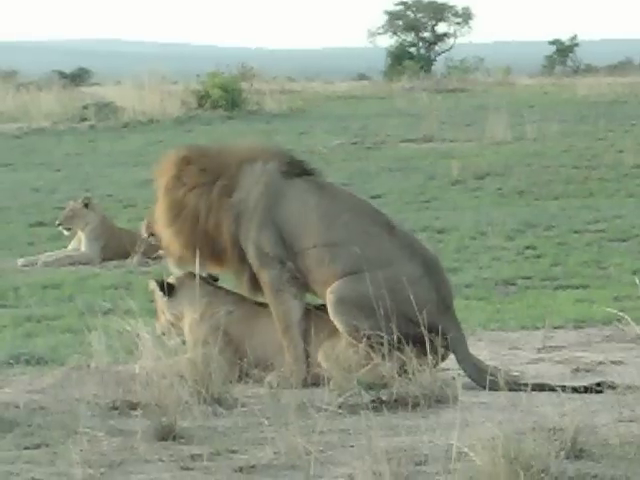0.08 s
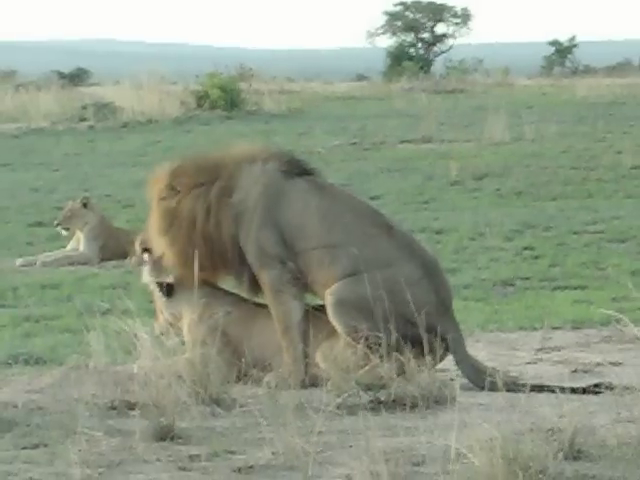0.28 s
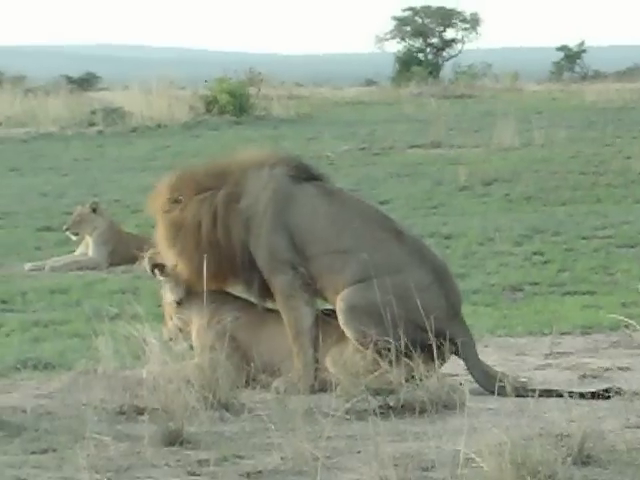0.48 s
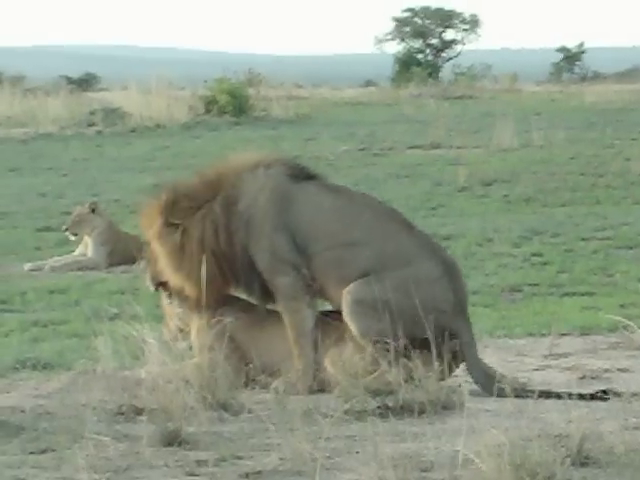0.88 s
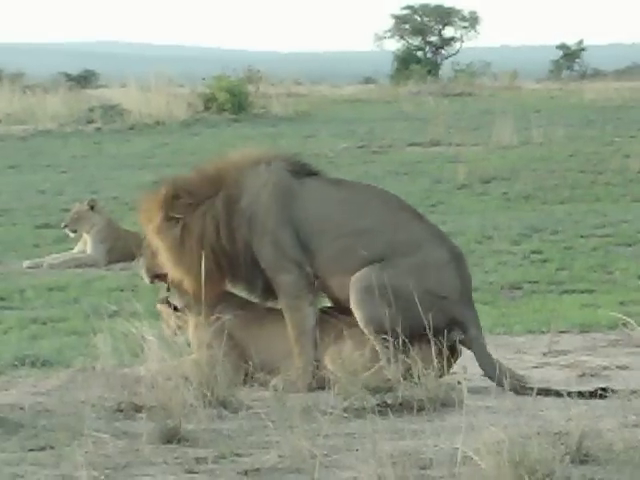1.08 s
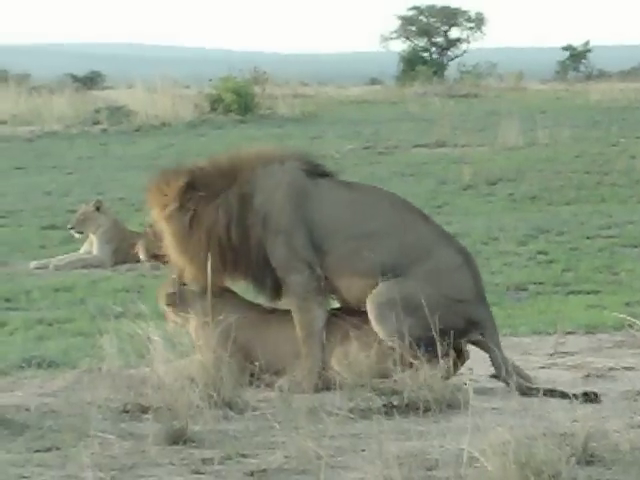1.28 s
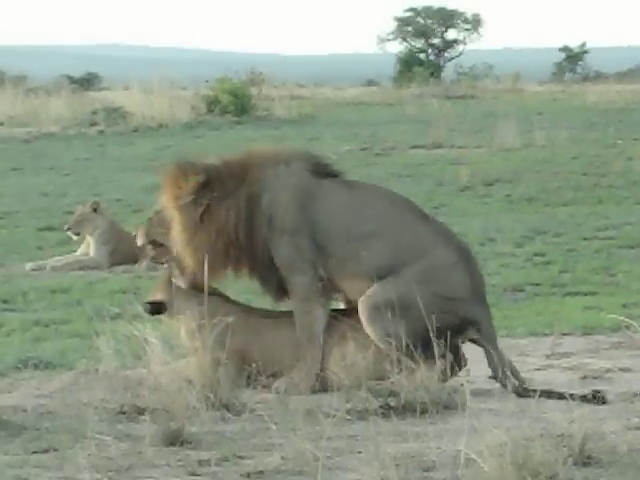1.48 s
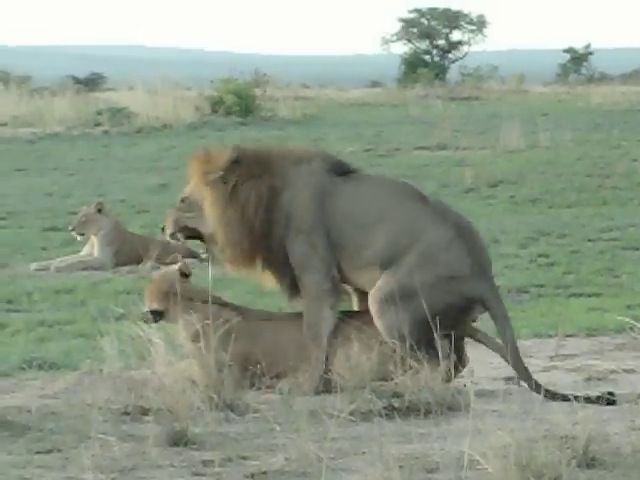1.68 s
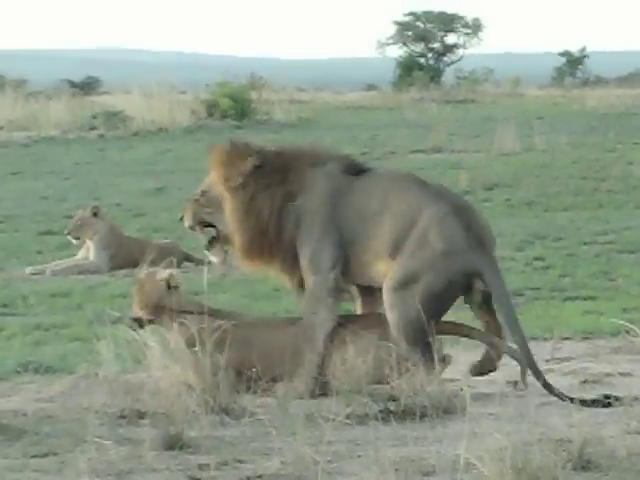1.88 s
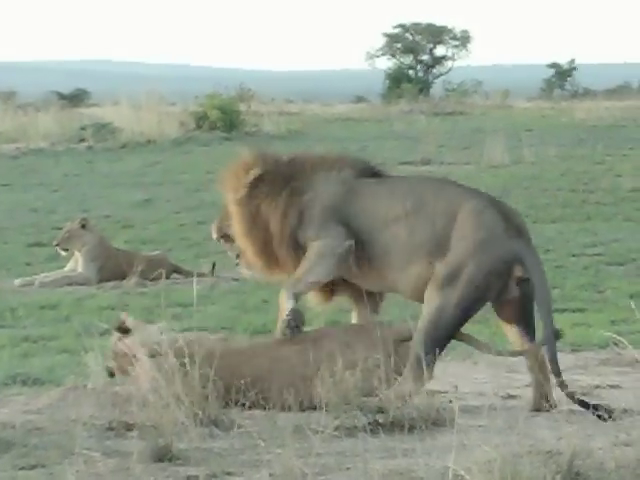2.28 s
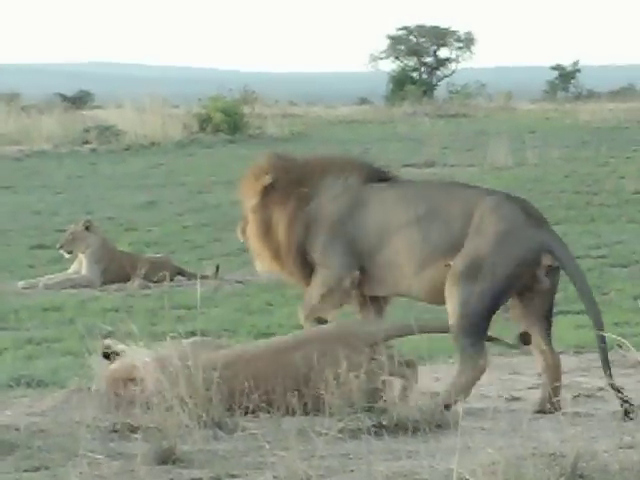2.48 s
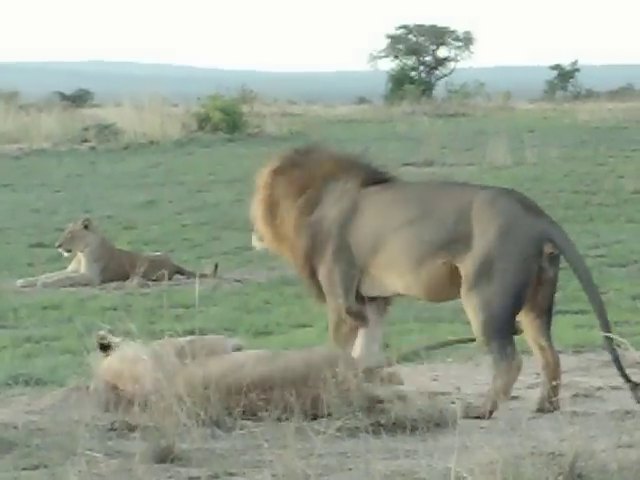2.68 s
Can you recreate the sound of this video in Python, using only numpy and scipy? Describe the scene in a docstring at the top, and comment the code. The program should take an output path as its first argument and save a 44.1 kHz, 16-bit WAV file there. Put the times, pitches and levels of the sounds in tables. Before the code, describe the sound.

Lions growl outdoors over an idling engine with a low throb and a faint, thin whine. A rough, pitched growl comes at 0.1 to 0.4 seconds, another from 0.7 to 1.1. From 1.2 a loud snarl swells, overloads the microphone and sinks to a mutter by 2 seconds. Dry grass swishes faintly near 2.1 and 2.7, and something hard knocks once close by at 2.5.

```python
"""Mating lions beside an idling vehicle.

On open grassland, two rough growls swell into a loud, pitched snarl that overloads the microphone and
sinks back to a mutter. Vibrating vocal folds carry the pitch; slack, flapping folds add the grit.
Dry grass rustles as the cats part, and something hard knocks once close to the microphone.
Under it all, the engine idles with a throb and a thin whine."""
import sys
import numpy as np
from scipy import signal
from scipy.fft import rfft, irfft
from scipy.io import wavfile
from scipy.ndimage import uniform_filter1d

SR = 44100
rng = np.random.default_rng(int(sys.argv[2]) if len(sys.argv) > 2 else 0)


def persist_wave(psi):
    """Save psi, clipped to +-1, as 16-bit WAV."""
    counts = np.round(np.clip(psi, -1, 1) * 32767).astype(np.int16)
    wavfile.write(sys.argv[1], SR, np.atleast_2d(counts).T)


N = 123479

# Pitched voice, one contour per call:
# time_s, pitch_hz, level_db, overtones_db, half_partials_db, roughness (0-1)
FIRST_CALL = [(.13, 385, -28, -12, -4, 0.36), (.17, 360, -15.5, -20, -18, 0.16),
              (.215, 354.2, -13, -14.5, -20, 0.15), (.245, 334.3, -17.5, -5, -5.5, .25),
              (.275, 275.7, -18, -3, 1, .12), (.335, 275, -15, -8, -1, 0.08),
              (.395, 269.6, -18, -3.5, 0.5, 0.19), (.445, 260.4, -37.5, 2, 12, 0.25)]
SECOND_CALL = [(.66, 293.3, -22.5, -6, -1, 0.66), (.75, 295.5, -24.5, -8.5, -10, .25),
               (.8, 304.4, -16, -9, -10.5, 0.24), (.87, 294.4, -22, -12, -20, 0.27),
               (.93, 294.2, -23.5, -1, -10, 0.67), (.995, 287.7, -20.5, -8, -3, 0.25),
               (1.04, 279, -32.5, -2, -2, 0.33), (1.1, 282, -16, -17, -17, 0.35),
               (1.16, 243, -26.5, -5, -2, 0.41)]
SNARL = [(1.16, 255, -21, -12, -17, .3), (1.215, 275, -15.5, -16, -14, .15),
         (1.25, 279, -11.8, -20, -18, .08), (1.3, 290, -13, -14, -12, .12),
         (1.345, 301, -7.5, -19, -22, .1), (1.378, 322, -7.2, -21, -19, .12),
         (1.395, 328, -10.5, -14, -12, .25), (1.452, 354, -12, -12, -10, .35), (1.464, 305, -13, 0, 0, .12),
         (1.5, 323, -9, -3, -1.5, .04), (1.525, 326, -8.4, -4.5, -3, .04), (1.552, 329, -5.9, -9, -8, .04),
         (1.618, 314, -6.6, -7, -9.8, .04), (1.627, 305, -8, -8.5, -20, .05),
         (1.68, 289, -4.5, -18, -28, .05), (1.72, 293, -4, -16, -25, .05),
         (1.782, 301, -4.8, -7.5, -17, .06), (1.795, 297, -16, -1, -14, .2),
         (1.818, 300, -7.3, -9, -22, .08), (1.85, 295, -7.6, -9, -18, .12), (1.885, 278, -15.5, -9, -7, .4),
         (1.985, 283, -21.5, -11, -8, .3)]
# Partials of the voice, on and halfway between its harmonics: pitch_multiple, gain_db
OVERTONES = [(2, 0), (3, -16), (4, -36.5), (5, -34.5), (6, -38)]
HALF_PARTIALS = [(.5, -15.5), (1.5, -6), (2.5, -5), (4.5, -30), (5.5, -32.5)]
JITTER, SHIMMER, FLUTTER_HZ = 0.0693, 0.22, 59.45  # pitch and level waver at full roughness; top rate
THROAT_LAG_CYCLES = .18

# Contour of the growl: time_s, level_db, lowest_resonance_hz, upper_resonances_db
GROWL_CONTOUR = [(0, -27, 389, -7), (.12, -31.5, 380, 7.5), (.165, -17, 385, -1), (.21, -14, 390, -2),
                 (.255, -11, 390, -9.5), (.3, -17, 405, -6), (.38, -27, 400, 10.5), (.46, -25, 381, 2.5),
                 (.6, -27, 315, -0.5), (.7, -16.5, 370, -4), (.8, -11.5, 353, -7.5), (.91, -19, 325, -5.5),
                 (1.07, -19, 307, -5.5), (1.22, -20, 271, -2), (1.33, -16.5, 329, -4),
                 (1.445, -8.5, 400, -4), (1.47, -22, 369, 1), (1.7, -32.5, 349, 3), (1.83, -24, 350, -0.5),
                 (1.9, -12, 275.3, -10), (2.02, -31.5, 378.5, 0), (2.2, -31.5, 403, 4),
                 (2.52, -36.5, 397, 7)]
# Upper throat resonances: centre_hz, width_hz, gain_db
THROAT_FORMANTS = [(530.6, 117, 9), (643.4, 44, 4), (880, 170, -15.5), (1460, 710, -36)]
FLAPS_PER_S, FLAP_SCATTER, FLAP_SPREAD_DB, PUFF_SHARE = 130, .22, 1, 0.33

# Hard slaps of the folds: start_s, level_db
FOLD_SLAPS = [(.203, -4), (.212, -6), (.2425, -7), (.263, -6), (.314, -9), (1.324, -10), (1.366, -9),
              (1.419, -6), (1.45, -4)]
# Throat ring and bright snap of each slap: pitch_hz, gain_db, rise_s
SLAP_RING = [(390, 0, 0.0021), (1650, -16, 0.00032)]

# Strike and rebound of the knock: start_s, level_db
KNOCK_HITS = [(2.5092, 5), (2.5122, -1)]
# Modes of the hard object: pitch_hz, gain_db, t60_s
KNOCK_MODES = [(1300, -1.5, 0.014), (1113, -8.5, 0.014), (2200, -9, 0.0073)]

# Swishes of dry grass: centre_s, length_s, level_db
GRASS_SWISHES = [(2.133, 0.0052, -22.5), (2.684, 0.0082, -30), (2.777, .028, -30)]
# Tone colour of the grass: frequency_hz, gain_db
GRASS_SPECTRUM = [(300, -5.5), (900, 13), (1700, 5), (3000, 2), (5300, -19)]

# Partials of the engine hum: shaft_multiple, level_db
ENGINE_ORDERS = [(1, -39.5), (2, -33.5), (3, -42), (4, -39), (5, -33), (7, -39.5), (8, -35), (15, -34),
                 (18, -34.5), (19, -40.5), (20, -33), (24, -39), (37, -44.5)]
# Tone colour of the engine's noise and hiss: frequency_hz, gain_db
ENGINE_SPECTRUM = [(20, -11), (70, -9), (140, -1.5), (230, -2.5), (400, 2), (570, 1), (850, -2.5),
                   (1200, -15), (2000, -24.5), (2800, -22), (3300, -30.5), (4000, -30.5), (5300, -36)]
SHAFT_HZ, SHAFT_WANDER, THROB_DEPTH, THROB_DECAY_TURNS = 23.27, 0.0059, 0.45, 0.36
WHINE_HZ, WHINE_DB, ENGINE_NOISE_DB = 3663, -54, -23

DUCK_ABOVE_DB, DUCK_SHARE, DUCK_DELAY_S, PEAK_FALL_DB_PER_S = -13.5, 0.41, 0.012, 56
MIC_EDGE_HZ, CLIP_LEVEL, TREBLE_LOSS_DB, BAND_EDGE_HZ = 5680, .71, -9, 15800


def pitched_call(contour):
    """Vocal folds on one gliding pitch; alternating strong and weak beats add half-pitch partials."""
    t = np.arange(N) / SR
    hz, db, overtones_db, half_db, roughness = curves(contour, t)
    phase = 2 * np.pi * np.cumsum(hz * (1 + JITTER * roughness * wobble(FLUTTER_HZ))) / SR
    lag = 2 * np.pi * THROAT_LAG_CYCLES  # the throat holds the partials back a little
    tone = np.sin(phase)
    for partials, group_db in ((OVERTONES, overtones_db), (HALF_PARTIALS, half_db)):
        for multiple, partial_db in partials:
            flicker = 1 + SHIMMER * roughness * wobble(FLUTTER_HZ)
            tone += amp(group_db + partial_db) * np.sin(multiple * phase - lag) * flicker
    gate = np.clip(np.minimum(t - contour[0][0], contour[-1][0] - t) / 0.0017, 0, 1)
    shimmer = 1 + SHIMMER * roughness * wobble(FLUTTER_HZ)
    return np.sqrt(2) * gate * amp(db) * tone * shimmer


def growl():
    """Slack folds flap unevenly; each flap and its puff of air ring the throat."""
    db, lowest_hz, upper_db = curves(GROWL_CONTOUR, np.arange(N) / SR)
    cycles = np.cumsum(FLAPS_PER_S * np.exp(FLAP_SCATTER * wobble(FLUTTER_HZ))) / SR
    flaps = np.diff(np.floor(cycles), prepend=0) * amp(FLAP_SPREAD_DB * wobble(FLUTTER_HZ))
    puffs = np.exp(-(cycles % 1) / 0.84) * rng.standard_normal(N)
    drive = (1 - PUFF_SHARE) * unit(flaps - flaps.mean()) + PUFF_SHARE * unit(puffs)
    chest = unit(resonate(drive, lowest_hz, width_hz=189))
    upper = sum(amp(gain) * unit(resonate(drive, hz, width)) for hz, width, gain in THROAT_FORMANTS)
    return amp(db) * high_pass(chest + amp(upper_db) * unit(upper), hz=205)


def rasps(detune=0.044):
    """Now and then the folds slap shut hard: the throat rings for a moment under a bright snap."""
    out, t = np.zeros(N), np.arange(SR // 30) / SR
    for start_s, db in FOLD_SLAPS:
        for hz, ring_db, rise_s in SLAP_RING:
            envelope = t / rise_s * np.exp(1 - t / rise_s)
            ring_hz = hz * np.exp(detune * rng.standard_normal())
            add(out, start_s, amp(db + ring_db) * envelope * np.sin(2 * np.pi * ring_hz * t))
    return out


def whimper():
    """A thin, breathy note high in the throat, tucked into the second growl."""
    breath = unit(resonate(rng.standard_normal(N), hz=1000, width_hz=160))
    return swell(centre_s=.93, length_s=.07, db=-31.5) * breath


def knock(contact_s=0.00074):
    """A small hard object strikes and rebounds, so fast that it lands as one short knock."""
    out, t = np.zeros(N), np.arange(SR // 10) / SR
    ring = sum(amp(db - 60 * t / t60) * np.sin(2 * np.pi * hz * t) for hz, db, t60 in KNOCK_MODES)
    attack = 1 - np.exp(-t / contact_s)
    for start_s, db in KNOCK_HITS:
        add(out, start_s, amp(db) * ring * attack)
    return out


def grass_rustles():
    """Short grainy swishes of dry grass under the paws."""
    envelope = sum(swell(*swish) for swish in GRASS_SWISHES)
    grains = coloured_noise(GRASS_SPECTRUM) * amp(4.2 * wobble(hz=280))
    return envelope * unit(grains)


def idling_engine():
    """The bed: a low shaft hum, noise that throbs with each turn, and a thin whine."""
    turns = np.cumsum(SHAFT_HZ * (1 + SHAFT_WANDER * wobble(hz=7.27))) / SR
    hum = sum(amp(db) * np.cos(2 * np.pi * (order * turns + rng.random())) for order, db in ENGINE_ORDERS)
    whine = amp(WHINE_DB) * np.sin(2 * np.pi * WHINE_HZ * np.arange(N) / SR)
    throb = unit(1 + THROB_DEPTH * np.exp(-(turns % 1) / THROB_DECAY_TURNS))
    noise = amp(ENGINE_NOISE_DB) * coloured_noise(ENGINE_SPECTRUM)
    return np.sqrt(2) * (hum + whine) + noise * throb


def amp(db):
    """Decibels to gain."""
    return 10 ** (np.asarray(db) / 20)


def unit(x):
    """Scales to rms 1."""
    return x / np.sqrt(np.mean(x ** 2) + 1e-20)


def curves(table, t):
    """A table's columns as straight ramps between its time points."""
    times, *columns = np.transpose(table)
    return [np.interp(t, times, column) for column in columns]


def swell(centre_s, length_s, db):
    """A bell-shaped fade in and out."""
    return amp(db) * np.exp(-(2 * (np.arange(N) / SR - centre_s) / length_s) ** 2)


def add(mix, start_s, sound):
    """Drops a sound into the mix on its cue."""
    part = mix[round(start_s * SR):][:len(sound)]
    part += sound[:len(part)]


def wobble(hz):
    """Random wavering up to about a given rate."""
    f = np.fft.rfftfreq(N, 1 / SR)
    return unit(irfft(rfft(rng.standard_normal(N)) / (1 + (f / hz) ** 4), N))


def coloured_noise(spectrum):
    """Noise through an EQ curve, at rms 1."""
    hz, db = np.transpose(spectrum)
    f = np.fft.rfftfreq(N, 1 / SR)
    gain = amp(np.interp(np.log(f + 1), np.log(hz), db))
    return unit(irfft(rfft(rng.standard_normal(N)) * gain, N))


def resonate(x, hz, width_hz):
    """A steep resonance that can sweep."""
    carrier = np.exp(2j * np.pi * np.cumsum(hz * np.ones(N)) / SR)
    r = np.exp(-np.pi * width_hz / SR)
    return (carrier * signal.lfilter([(1 - r) ** 2], [1, -2 * r, r * r], x / carrier)).real


def low_pass(x, hz, taps):
    """Steep high cut."""
    return signal.oaconvolve(x, signal.firwin(taps, hz, window=("kaiser", 8), fs=SR), "same")


def high_pass(x, hz):
    """Low cut, 24 dB per octave."""
    return signal.sosfilt(signal.butter(4, hz, "high", fs=SR, output="sos"), x)


def scene():
    """The lions, the engine and the small noises in open air, in mono."""
    lions = growl() + rasps() + whimper()
    lions += sum(pitched_call(contour) for contour in (FIRST_CALL, SECOND_CALL, SNARL))
    return (lions + idling_engine() + knock() + grass_rustles())[None]


def record(dry):
    """A dull microphone whose gain ducks after sharp peaks; it clips hard, then loses some treble."""
    t = np.arange(N) / SR
    mic = low_pass(dry[0], MIC_EDGE_HZ, taps=161)
    treble_db = 20 * np.log10(abs(high_pass(mic, hz=1100)) + 1e-9)
    fall_db = t * PEAK_FALL_DB_PER_S
    held_db = np.maximum.accumulate(treble_db + fall_db) - fall_db  # peak hold with a steady release
    excess_db = uniform_filter1d(np.maximum(held_db - DUCK_ABOVE_DB, 0), size=200)
    duck_db = DUCK_SHARE * np.interp(t - DUCK_DELAY_S, t, excess_db)  # late, so attacks punch through
    clipped = np.clip(mic / amp(duck_db), -CLIP_LEVEL, CLIP_LEVEL)
    body = low_pass(clipped, MIC_EDGE_HZ, taps=161)
    fizz = amp(TREBLE_LOSS_DB) * (clipped - body)
    return low_pass(body + fizz, BAND_EDGE_HZ, taps=255)[None]


dry = scene()
out = record(dry)
persist_wave(out)
```